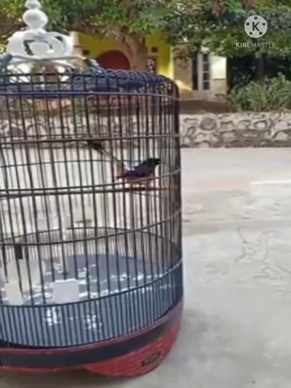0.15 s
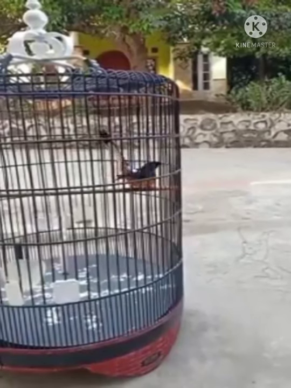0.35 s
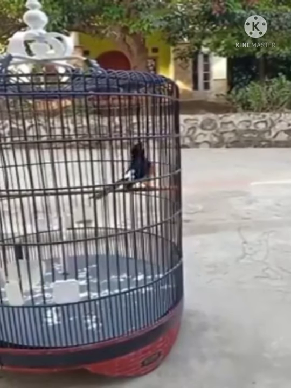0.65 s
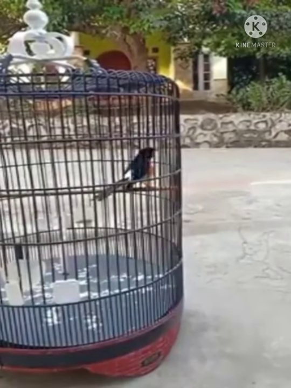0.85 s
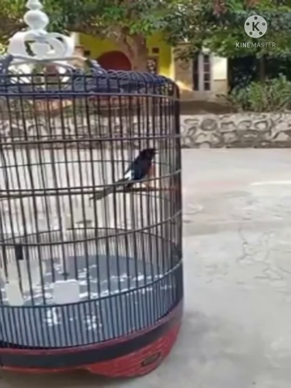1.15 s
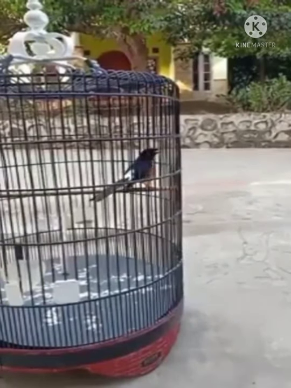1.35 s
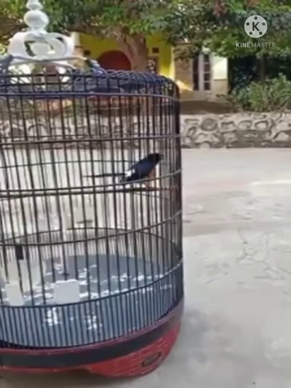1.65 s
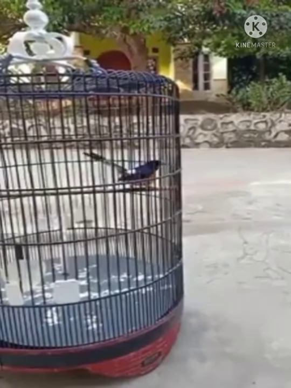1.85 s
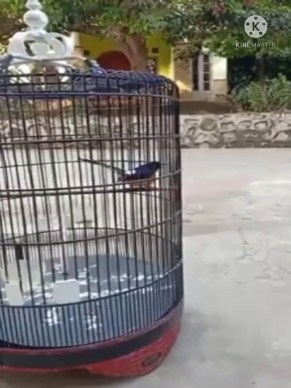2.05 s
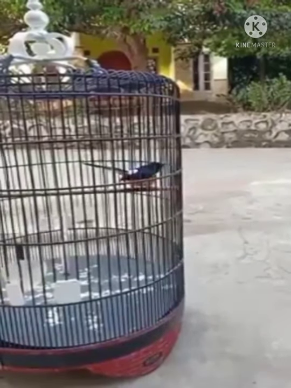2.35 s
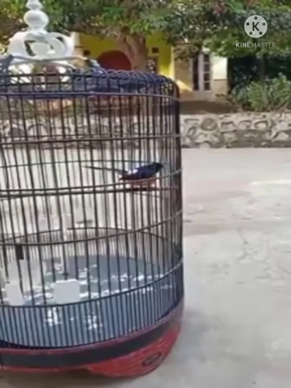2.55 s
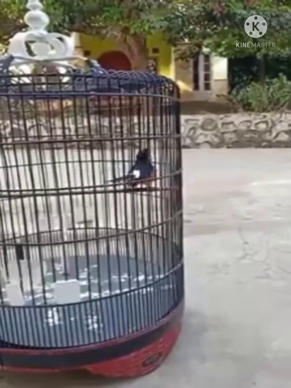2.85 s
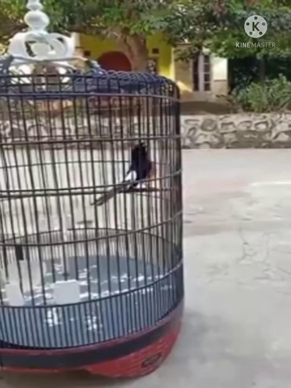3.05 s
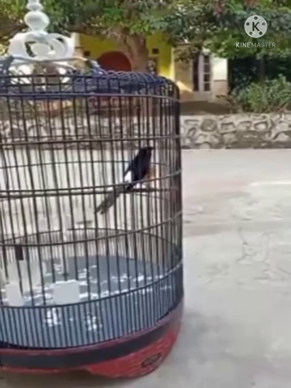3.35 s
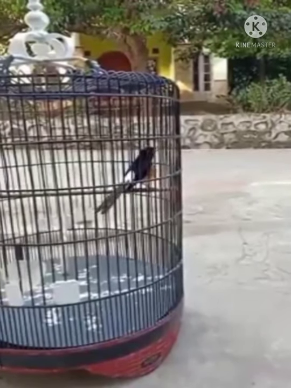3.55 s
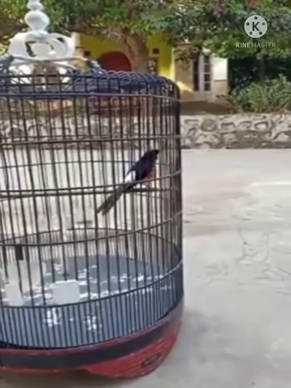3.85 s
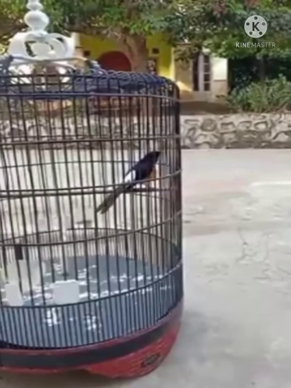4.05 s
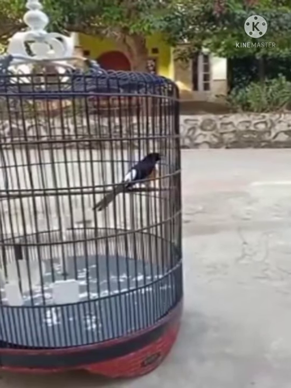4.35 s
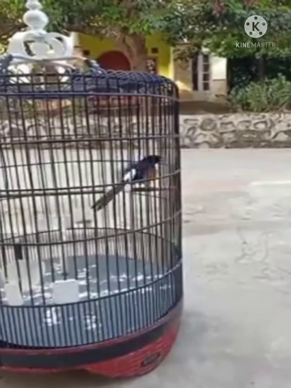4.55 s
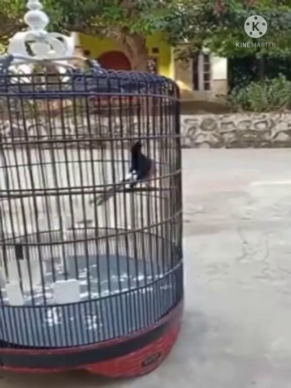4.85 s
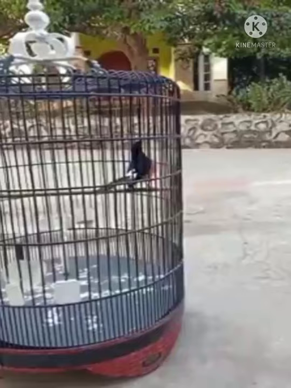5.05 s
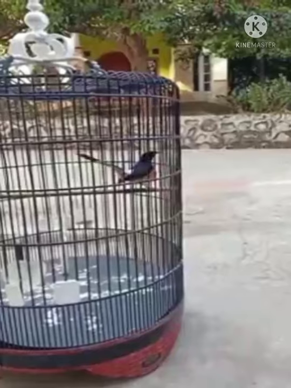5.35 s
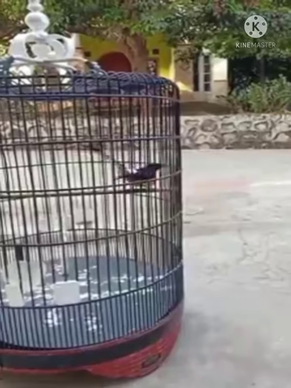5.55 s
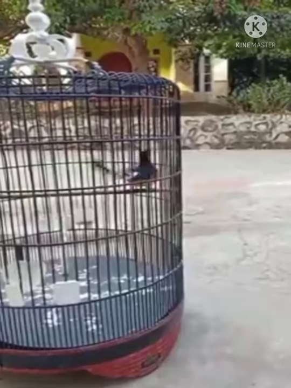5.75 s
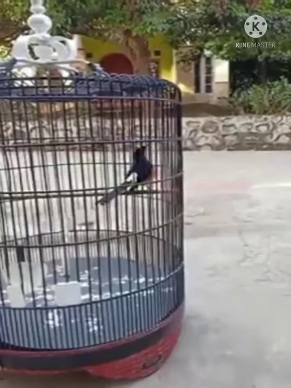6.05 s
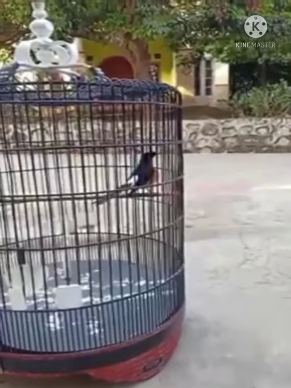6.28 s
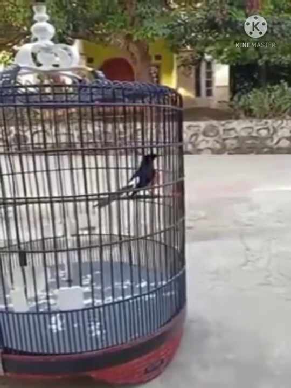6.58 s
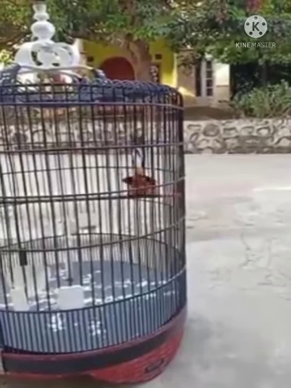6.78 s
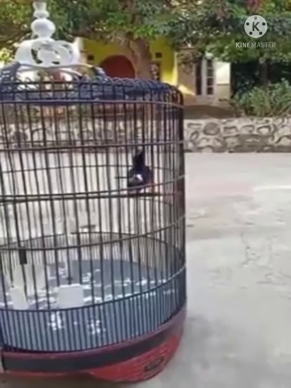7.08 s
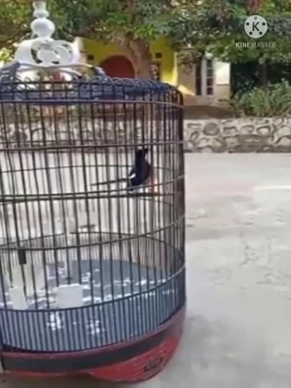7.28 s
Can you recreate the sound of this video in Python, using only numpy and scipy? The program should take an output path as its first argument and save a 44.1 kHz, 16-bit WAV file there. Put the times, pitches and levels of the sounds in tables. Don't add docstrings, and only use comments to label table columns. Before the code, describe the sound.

Close to a phone microphone, a caged bird opens with brief chirps, then a pulsing climbing whistle and a long falling one. Bubbling warbles alternate with squealing, hissing outbursts, then a pause and three harsh rasps. Distant birds trill and whistle; an engine drones and a motorbike passes late. The walled yard adds short echoes, and the loudest notes distort.

```python
import sys
import numpy as np
from scipy import signal
from scipy.fft import next_fast_len
from scipy.io import wavfile
from scipy.ndimage import uniform_filter1d

SR = 44100
rng = np.random.default_rng(int(sys.argv[2]) if len(sys.argv) > 2 else 0)


def field_ratio(decibels):
    return 10 ** (np.asarray(decibels, dtype=float) / 20)


def transcribe(u):
    v = np.clip(np.atleast_2d(u).T, -1, 1)
    q = np.round(v * 32767).astype(np.int16)
    wavfile.write(sys.argv[1], SR, q)


N = 327222


def evened(x):
    return x / np.sqrt(np.mean(x ** 2) + 1e-20)


def add(mix, s, sound):
    sound = sound[max(-round(s * SR), 0):]
    part = mix[max(round(s * SR), 0):][:len(sound)]
    part += sound[:len(part)]


def columns(rows):
    s, *values = np.transpose(rows)
    t = np.arange(s[0], s[-1], 1 / SR)
    return [np.interp(t, s, v) for v in values]


def band(x, lo_hz, hi_hz):
    sos = signal.butter(4, [lo_hz, hi_hz], "band", fs=SR, output="sos")
    return signal.sosfiltfilt(sos, x, padtype="even")


def wobble(count, hz):
    knots = rng.standard_normal(int(8 * hz * N / SR) + 2)
    smooth = evened(uniform_filter1d(uniform_filter1d(knots, size=8), size=8))
    return np.interp(np.arange(count) * (8 * hz / SR), np.arange(len(knots)), smooth)


def ramps(count, fade_s):
    t = np.arange(count) / SR
    return np.clip(np.minimum(t, t[::-1]) / fade_s, 0, 1)


def noise(spectrum, patchy_db):
    hz = np.fft.rfftfreq(1024, 1 / SR)
    a, b, patches = rng.standard_normal((N // 256 + 5, 513, 3)).T
    patches = evened(uniform_filter1d(uniform_filter1d(patches, 8, 0), 14, 1))
    f, db = np.transpose(spectrum)
    colour_db = np.interp(np.log(hz + 1), np.log(f + 1), db)[:, None]
    spectra = (a + 1j * b) * field_ratio(colour_db + patchy_db * patches)
    x = signal.istft(spectra, nperseg=1024, noverlap=768)[1][:N]
    return x / np.std(band(x, 240, 692))


# frequency in Hz, density in dB per Hz.
AIR_SPECTRUM = [(15, -40.5), (25, -10), (48, -14), (72, -3), (172, -2.5), (410, -16.5), (980, -13),
                (1460, -20), (1760, -12), (1890, -16.5), (2690, -11), (2960, -32), (5450, -21),
                (6900, -28.5), (8970, -64), (15200, -120)]
# time in seconds, level in dB.
AIR_LEVEL = [(0.0, -49.5), (4.09, -57), (5.1, -47.5), (7.42, -56)]


def yard_air():
    out, level_db = np.zeros(N), columns(AIR_LEVEL)[0]
    add(out, 0, field_ratio(level_db - 1.5) * noise(AIR_SPECTRUM, 1.8)[:len(level_db)])
    return out


def exhaust(turns, orders, drift_db):
    count = len(turns)
    out = np.zeros(count)
    for k, db in orders:
        level = field_ratio(db + drift_db * wobble(count, 0.84))
        out += level * np.cos(2 * np.pi * (k * turns + .08 * wobble(count, 3)))
    return out


# time in seconds, firings in Hz, levels of multiples 4, 5 and 6 in dB.
DRONE = [(0.0, 30.2, -34, -35.5, -37), (1.07, 33.0, -44, -51.5, -56), (2.56, 33.56, -48, -49.5, -61),
         (3.41, 23.62, -54, -56, -52), (6.1, 28.4, -50, -41, -42), (7.42, 30.78, -50, -43, -46)]
# multiple of the firing rate, level in dB.
DRONE_ORDERS = [(2, -55), (3, -50), (7, -63), (8, -61), (9, -60), (10, -59.5)]


def drone():
    out = np.zeros(N)
    rate, *levels = columns(DRONE)
    orders = DRONE_ORDERS + list(zip(range(4, 7), levels))
    add(out, 0, field_ratio(-0.5) * exhaust(np.cumsum(rate) / SR, orders, 2.3))
    return out


# time in seconds, firings in Hz, exhaust level in dB, tyre and engine rush in dB.
BIKE = [(0, 19, -54.5, -63.5), (1.6, 19, -47, -57), (3, 19, -46, -51.5), (4.1, 18.9, -54, -51),
        (4.6, 18.7, -44, -42), (5.1, 18.4, -52, -35), (5.5, 18.3, -49, -35), (5.8, 17.7, -43, -39.5),
        (6.2, 17.6, -59, -48), (7.42, 16, -55, -51)]
# multiple of the firing rate, level in dB.
BIKE_ORDERS = [(3, -15.5), (4, -0.5), (5, -10), (6, 9.5), (7, -6), (8, 3.5), (9, -1), (10, -12.5)]
# frequency in Hz, density in dB per Hz.
RUSH_SPECTRUM = [(120, -44.5), (200, -16.5), (432, -9.5), (684, -3.5), (867, -15.5), (1040, -12),
                 (1390, -13), (2750, -13), (6900, -22.5), (8970, -49.5), (15200, -120)]


def motorbike():
    out = np.zeros(N)
    rate, db, rush_db = columns(BIKE)
    turns = np.cumsum(rate) / SR
    throb = 1 + 0.1 * np.cos(2 * np.pi * turns)
    add(out, 0, field_ratio(db) * evened(exhaust(turns, BIKE_ORDERS, 5.4)))
    add(out, 0, field_ratio(rush_db - 5) * throb * noise(RUSH_SPECTRUM, 3.5)[:len(turns)])
    return out


def tone(hz, overtone_db):
    turn = 2 * np.pi * np.cumsum(hz) / SR
    second = field_ratio(overtone_db - 14.3 * (hz / 1000 - 1))
    return np.sin(turn) + second * np.sin(2 * turn) + second ** 3.1 * np.sin(3 * turn)


def sing(notes, overtone_db, edge, waver, flutter_db, rough_hz):
    out, bend, shake = np.zeros(N), wobble(N, rough_hz), wobble(N, rough_hz)
    for s, length, start, middle, end, db in notes:
        u = np.linspace(0, 1, max(int(1.15 * length * SR), 8))
        at = min(max(round(s * SR), 0), N - len(u))
        parabola = np.polyfit([0, .5, 1], [start, middle, end], 2)
        hz = np.polyval(parabola, np.clip(1.15 * u - .075, 0, 1))
        hz = hz * (1 + waver * bend[at:][:len(u)])
        level = field_ratio(db + flutter_db * shake[at:][:len(u)])
        level = level * signal.windows.tukey(len(u), np.clip(edge, 0, 1))
        add(out, s - .075 * length, level * tone(hz, overtone_db))
    return out


def whistled(notes):
    return sing(notes, overtone_db=-29.5, edge=0.7, waver=0.0045, flutter_db=1.2, rough_hz=122.1)


def bowed(rows, bow):
    return [(s, length, a, (a + b) / 2 * (1 + bow), b, db) for s, length, a, b, db in rows]


# start in seconds, length in seconds, first pitch in Hz, last pitch in Hz, peak level in dB.
ARCHED = [(-.003, .033, 2580, 2560, -13.5), (.031, .01, 2600, 2600, -22), (.044, .018, 2600, 2550, -19),
          (2.597, .011, 2180, 2280, -16), (4.153, .014, 2100, 2230, -19), (2.938, .008, 2500, 3000, -18),
          (6.862, .009, 5100, 5150, -26), (6.951, .014, 2250, 2400, -30), (6.974, .012, 3400, 3500, -33),
          (7.134, .02, 2330, 2340, -27), (7.357, .009, 900, 1200, -30), (.113, .1, 1280, 1990, -24),
          (.204, .069, 1920, 1910, -22.5), (2.603, .015, 2250, 2520, 1), (2.947, .016, 1950, 2600, -6),
          (3.054, .0092, 2180, 1900, -3), (3.084, .043, 2230, 1800, -3.5), (4.16, .027, 2380, 2370, 2),
          (4.283, .016, 6000, 6050, -22), (2.705, .009, 5100, 5300, -10.5), (6.69, .014, 4200, 3950, -9.5),
          (6.845, .024, 5450, 5650, -24), (6.716, .01, 5400, 5100, -12), (4.869, .042, 3450, 4100, -12),
          (4.867, .045, 4450, 5200, -17)]
SAGGING = [(.247, .055, 1960, 1830, -15.5), (2.618, .015, 2560, 2250, 2), (6.702, .019, 4000, 2500, -18),
           (2.928, .011, 2800, 2450, -11.5), (2.987, .02, 2620, 2400, -1.5), (3.026, .029, 2430, 2180, .6),
           (4.177, .019, 2420, 2360, 2), (4.863, .047, 2230, 2690, -16.5)]


def single_notes():
    return whistled(bowed(ARCHED, .03) + bowed(SAGGING, -.035))


# start in seconds, length in seconds, pitch in Hz, peak level in dB.
FAR_LEVEL = [(.141, .03, 920, -30.5), (1.081, .22, 1175, -34.5), (2.494, .15, 1205, -32),
             (5.31, .07, 1520, -35), (5.23, .08, 2000, -34), (5.38, .03, 1110, -35), (1.71, .04, 940, -35),
             (3.265, .075, 1200, -37), (3.47, .09, 450, -43), (4.2, .1, 300, -43), (1.03, .06, 790, -41),
             (7.176, .087, 1660, -34), (7.334, .03, 1625, -34), (.079, .02, 1550, -35.4),
             (6.904, .076, 767, -38.5), (1.242, .064, 1597, -38.5)]
# start in seconds, length in seconds, first and last pitch in Hz, peak level in dB.
FAR_GLIDES = [(5.3, .14, 2010, 2200, -29), (5.42, .13, 2180, 2440, -24), (5.755, .12, 1900, 1820, -26),
              (5.865, .045, 1820, 2080, -27), (5.92, .09, 1200, 1400, -32), (6.3, .09, 1230, 1530, -34),
              (6.38, .05, 1500, 1930, -33), (6.95, .033, 2300, 3500, -32), (6.983, .016, 3500, 5150, -30),
              (5.551, .08, 2570, 2890, -26.5), (5.893, .11, 2060, 2430, -21.5),
              (6.004, .065, 2440, 2890, -28.5), (6.11, .15, 1120, 1920, -33.5),
              (6.558, .064, 1630, 2020, -31), (6.635, .08, 2080, 2220, -20), (7.134, .022, 2000, 2080, -26),
              (7.155, .03, 1680, 1560, -30), (6.858, .1, 1770, 1530, -31.5)]
FAR_HOOKED = [(6.497, .06, 2266, 1660, -32.5), (7.0, .13, 1880, 1532, -33)]


def far_birds():
    calls = [(s, length, hz, hz, hz, db) for s, length, hz, db in FAR_LEVEL]
    calls += bowed(FAR_GLIDES, 0) + bowed(FAR_HOOKED, -.11)
    return sing(calls, overtone_db=-33, edge=.7, waver=.005, flutter_db=1.0, rough_hz=60)


# start in seconds, pitch in Hz, peak level in dB, dip at the pulse's ends in dB.
CLIMB = [(.606, 1335, -28, 5), (.674, 1245, -22, 3), (.724, 1264, -21, 4), (.766, 1345, -15, 14),
         (.809, 1404, -15, 13), (.849, 1570, -13, 6), (.898, 1800, -4, 20), (.936, 1890, 2, 24),
         (.982, 2005, -1, 11), (1.013, 2050, -6, 6), (1.03, 2170, -3.5, 10), (1.062, 2220, -8, 3),
         (1.088, 2340, -3.5, 7), (1.137, 2540, 0, 0)]


def climb():
    s, hz, db, dip_db = np.transpose(CLIMB)
    out, t, middle = np.zeros(N), np.arange(s[0], s[-1], 1 / SR), (s[1:] + s[:-1]) / 2
    pulse = np.searchsorted(s, t, "right") - 1
    off = abs(2 * (t - s[pulse]) / np.diff(s)[pulse] - 1) ** 2.2
    glide = np.interp(t, [s[0], *middle, s[-1]], [1420, *hz[:-1], hz[-1]])
    glide = uniform_filter1d(glide * (1 - .035 * off), size=200)
    level_db = uniform_filter1d(db[pulse] - dip_db[pulse] * off, size=200) + .7 * wobble(len(t), 120)
    edge = np.clip(np.minimum(t - s[0], s[-1] - t) / .008, 0, 1)
    add(out, s[0], edge * field_ratio(level_db) * tone(glide * (1 + .004 * wobble(len(t), 120)), -29.5))
    return out


# time in seconds, pitch in Hz, level in dB.
HELD = [(1.278, 2100, -26), (1.3, 2089, -13), (1.375, 2033, -9), (1.395, 2005, -4), (1.43, 2000, -6.5),
        (1.455, 1995, -3.5), (1.5, 1975, -2.5), (1.562, 1910, -2), (1.576, 1725, -13)]
# time in seconds, depth in dB.
PINCHES = [(1.352, 2), (1.372, 3), (1.424, 6), (1.469, 24), (1.518, 6), (1.534, 6)]


def held():
    out, (hz, db) = np.zeros(N), columns(HELD)
    t = HELD[0][0] + np.arange(len(hz)) / SR
    pinch_db = sum(depth_db * np.exp(-((t - s) / .0055) ** 2) for s, depth_db in PINCHES)
    level = np.sqrt(2) * field_ratio(db - pinch_db) * ramps(len(hz), .007)
    add(out, t[0], level * tone(hz * (1 + .004 * wobble(len(hz), 50)), -34))
    return out


# time in seconds, pitch in Hz, level in dB.
TRILL = [
    [(1.28, 2780, -52.5), (1.45, 2914, -38), (1.8, 2939, -31.5), (2.25, 2914, -29), (2.4, 2960, -25.5),
     (2.6, 2990, -27), (2.85, 3010, -26), (2.98, 2950, -35.5)],
    [(5.75, 2724, -46), (5.9, 2750, -40), (6.46, 2725, -47)],
]


def trill():
    out = np.zeros(N)
    for rows in TRILL:
        hz, db = columns(rows)
        beat = 2 * np.pi * np.cumsum(19.0 * (1 + .04 * wobble(len(hz), 5.9))) / SR
        chop = 1 + 0.26 * np.cos(beat) + 0.27 * np.cos(2 * beat) + 0.52 * np.cos(3 * beat)
        level = 1.43 * field_ratio(db + 1.5 * wobble(len(hz), 30))
        add(out, rows[0][0], level * chop * tone(hz * (1 + .006 * wobble(len(hz), 150)), -36))
    return out


# start in seconds, length in seconds, low edge in Hz, high edge in Hz, level in dB.
BREATHS = [(1.77, 0.01, 900, 2600, -30), (2.632, 0.1, 1970, 4300, -21), (2.659, 0.076, 4620, 6500, -22.5),
           (2.921, .045, 1185, 3200, -24), (3.336, .012, 900, 2600, -27), (4.184, 0.035, 1956, 4300, -24),
           (4.218, .13, 2030, 4300, -23), (4.21, .12, 4500, 6700, -30), (4.854, 0.085, 2890, 6800, -24),
           (6.465, .038, 2290, 6800, -13), (6.541, 0.04, 2420, 6800, -17), (6.621, 0.04, 2300, 6800, -17),
           (6.711, 0.03, 2010, 5800, -17), (6.982, 0.04, 2430, 5200, -37), (2.604, .04, 3000, 6700, -38),
           (4.158, .04, 4300, 6700, -38), (7.135, 0.05, 1430, 2600, -30)]


def breaths():
    out, sputter = np.zeros(N), field_ratio(1.97 * wobble(N, 250))
    for (s, length, lo, hi, db), air in zip(BREATHS, rng.standard_normal((len(BREATHS), 8000))):
        u = np.arange(len(air)) / SR / length
        burst = np.clip(u / 0.098, 0, 1) * np.exp(-1.2 * u ** 2)
        add(out, s, field_ratio(db) * evened(band(air, lo, hi)) * burst)
    return out * sputter


# starts of buzz, swoop, first chirp and second chirp in seconds.
OPENINGS = [
    (1.776, 1.898, 2.009, 2.1),
    (3.341, 3.468, 3.583, 3.682),
]
OPENING_DB = [(-16, -19, 2, -3), (-19, -25, -5, 0)]
# length in seconds, pitch at start, middle and end in Hz.
BUZZ = (.104, 1090, 1000, 900)
# start in seconds, then the same columns, peak level in dB.
LAST_BUZZ = (7.36, .062, 1180, 1040, 980, -33)


def buzzes():
    notes = [(s[0], *BUZZ, db[0]) for s, db in zip(OPENINGS, OPENING_DB)] + [LAST_BUZZ]
    return sing(notes, overtone_db=-16, edge=.08, waver=.038, flutter_db=2.6, rough_hz=200)


# length in seconds, pitch at start, middle and end in Hz.
SWOOP_LEAP = (.014, 1000, 1300, 1660)
SWOOP = (.042, 1660, 1740, 1800)
CHIRP = (.046, 1390, 1680, 1700)
SNAP = (.036, 1390, 1740, 1880)
GRACE = (.02, 1520, 1720, 2100)
# start in seconds, length in seconds, low note in dB, top note in dB.
LOOPS = [(2.075, .085, -60, -9), (2.163, .081, -60, -10), (2.243, .063, -12, -15), (2.309, .069, -14, -29),
         (2.376, .061, -17, -28), (2.439, .06, -21, -35), (3.66, .085, -60, -12), (3.745, .083, -60, -13),
         (3.828, .071, -15.5, -20), (3.896, .067, -15, -26), (3.962, .065, -19, -38)]
# start and length as shares of the loop, start, middle and end pitch in Hz.
LOW = (0.0, .32, 870, 910, 1120)
LEAP = (.27, .2, 1050, 1480, 1690)
TOP = (.45, .26, 1690, 1820, 1780)
DROP = (.65, .25, 1820, 1330, 930)
# start and length in seconds, start, middle and end pitch in Hz, level in dB.
SLIDES = [(2.156, .042, 930, 1040, 1260, -17), (3.75, .03, 930, 1040, 1220, -14),
          (2.917, .03, 1750, 1270, 1550, -22)]


def warble():
    notes = list(SLIDES)
    for (_, swoop, one, two), (_, swoop_db, one_db, two_db) in zip(OPENINGS, OPENING_DB):
        notes.append((swoop - SWOOP_LEAP[0], *SWOOP_LEAP, swoop_db - 9))
        notes += [(swoop, *SWOOP, swoop_db), (one, *CHIRP, one_db), (two, *SNAP, two_db)]
        notes += [(s - .014, *GRACE, -18) for s in (one, two)]
    for s, length, low_db, top_db in LOOPS:
        levels = (low_db, low_db - 10, top_db, top_db - 4)
        for (at, share, *hz), db in zip((LOW, LEAP, TOP, DROP), levels):
            notes.append((s + at * length, share * length, *hz, db))
    return sing(notes, overtone_db=-24, edge=0.95, waver=0.007, flutter_db=1.3, rough_hz=295.2)


# time in seconds, pitch in Hz, level in dB.
SCREAMS = [
    [(2.632, 2200, -8), (2.638, 2750, 0), (2.642, 3150, -14), (2.646, 3420, -2), (2.655, 3750, -3),
     (2.661, 3000, -15), (2.667, 2200, -15)],
    [(2.666, 2250, -12), (2.676, 2950, -13), (2.684, 3620, -9), (2.691, 4150, -11), (2.708, 2600, -14),
     (2.717, 3500, -21), (2.724, 3970, -2), (2.73, 3900, -18), (2.736, 3950, -3), (2.742, 3850, -14),
     (2.756, 3800, -24)],
    [(4.192, 2300, -5), (4.211, 3740, -5), (4.223, 2350, -10), (4.233, 2700, -18), (4.241, 3480, -3),
     (4.251, 3750, -3), (4.259, 3660, -3), (4.262, 3050, -13), (4.269, 2200, -17)],
    [(4.268, 2250, -18), (4.279, 3650, -7), (4.291, 4150, -10), (4.307, 3550, -8), (4.313, 3300, -19),
     (4.321, 3740, -10), (4.329, 3660, -20), (4.334, 3700, -12), (4.341, 3500, -20)],
]


def screams():
    out = np.zeros(N)
    for rows in SCREAMS:
        parts = []
        for (s, *a), (end, *b) in zip(rows, rows[1:]):
            u = np.linspace(0, np.pi / 2, round((end - s) * SR), endpoint=False)
            straight = u / (np.pi / 2)
            curve = np.sin(u) if b[0] > a[0] else 1 - np.cos(u)
            way = .5 * curve + .5 * straight
            parts.append([a[0] + (b[0] - a[0]) * way, a[1] + (b[1] - a[1]) * straight])
        hz, db = np.hstack(parts)
        level = ramps(len(hz), .003) * field_ratio(db + 3.0 * wobble(len(hz), 600))
        add(out, rows[0][0], level * tone(hz * (1 + .013 * wobble(len(hz), 400)), -3))
    return out


# start in seconds, peak level in dB.
UNDERTONES = [(2.72, -17), (2.733, -16), (2.752, -16), (2.768, -24), (4.326, -20), (4.348, -16),
              (4.366, -24)]
# length in seconds, pitch at start, middle and end in Hz.
UNDERTONE = (.01, 1920, 1980, 1880)


def undertones():
    return whistled([(s, *UNDERTONE, db) for s, db in UNDERTONES])


# start in seconds, pip in dB, low rasp in dB, high rasp in dB.
HARSH = [
    (6.457, -11, -9, -7.5),
    (6.534, -15, -12, -7.5),
    (6.612, -13, -11, -7.5),
]
# length in seconds, start, middle and end pitch in Hz.
PIP = (.014, 2340, 2350, 2310)
CRACK = (.007, 4650, 4350, 3900)
RASP = (.03, 2950, 3220, 3340)
RASP_END = (.02, 3340, 3380, 3280)
# start and length in seconds, start, middle and end pitch in Hz, peak level in dB.
LAST_RASP = (6.725, .017, 4900, 4870, 4960, 0)
RASP_TAIL = (6.736, .05, 4960, 4920, 4860, -13)


def harsh_calls():
    clear, rasps = [RASP_TAIL], [LAST_RASP]
    for s, pip_db, low_db, high_db in HARSH:
        clear += [(s, *PIP, pip_db - 7), (s, PIP[0], *np.multiply(2, PIP[1:]), pip_db)]
        clear += [(s + .009, *CRACK, low_db), (s + .034, *RASP_END, low_db - 7)]
        rasps.append((s + .012, *RASP, low_db))
        rasps.append((s + .012, RASP[0], *np.multiply(1.92, RASP[1:]), high_db))
    rough = sing(rasps, overtone_db=-20, edge=.7, waver=.022, flutter_db=2.8, rough_hz=1600)
    return whistled(clear) + rough


# delay in seconds, level in dB.
ECHOES = [(.009, -22), (.016, -23), (.024, -23), (.034, -23), (.047, -25), (.068, -27), (.105, -32),
          (.16, -33)]
# frequency in Hz, time to fall 60 dB in seconds.
TAIL = [(800, 0.29), (2000, 0.36), (4000, 0.27), (7000, 0.28)]


def yard_echo(x, tail_db):
    hz, t, z = signal.stft(rng.standard_normal(SR // 2), SR, nperseg=256)
    f, t60 = np.transpose(TAIL)
    decay = field_ratio(-60 * t / np.interp(hz, f, t60)[:, None])
    tail = signal.istft(z * decay, SR, nperseg=256)[1]
    tail *= np.clip(np.arange(len(tail)) / SR / .025, 0, 1) ** 2
    taps = field_ratio(tail_db) * tail / np.linalg.norm(tail)
    for s, db in [(0, 0)] + ECHOES:
        taps[round(s * SR)] += field_ratio(db)
    return signal.fftconvolve(x, taps)[:N]


def scene():
    singer = single_notes() + climb() + breaths() + buzzes() + warble()
    singer += screams() + undertones() + harsh_calls()
    long_note = held()
    near = field_ratio(-1.0) * yard_echo(singer + .4 * long_note, -12.5) + .6 * long_note
    far = field_ratio(-4) * yard_echo(far_birds() + trill(), -8)
    return (near + far + drone() + motorbike() + yard_air())[None]


SPLIT_HZ = 6850


def masked(x, below_db, fade_db):
    hz, _, z = signal.stft(x, SR, nperseg=1024, noverlap=768)
    power = uniform_filter1d(uniform_filter1d(abs(z) ** 2, size=5, axis=0), size=5, axis=1)
    power_db = 10 * np.log10(abs(power) + 1e-20)
    slope = fade_db * hz[:, None] / 1000
    masker_db = np.maximum.accumulate(power_db + slope, axis=0) - slope
    chance = uniform_filter1d(rng.standard_normal(z.shape), size=5, axis=0)
    chance = evened(uniform_filter1d(chance, size=20, axis=1))
    excess_db = masker_db - below_db + 7.0 * chance - power_db
    keep = 1 / (1 + field_ratio(np.clip(3 * excess_db, -90, 60)))
    gain = np.where(hz[:, None] > 2500, keep, 1) * (hz[:, None] < SPLIT_HZ)
    return signal.istft(z * gain, SR, nperseg=1024, noverlap=768)[1][:N]


def tiled(x, tile_db):
    z = signal.stft(x, nperseg=512)[2]
    tiles = rng.standard_normal((len(z) // 6 + 1, z.shape[1] // 16 + 1))
    tiles = np.kron(tiles, np.ones((6, 16)))
    return signal.istft(z * field_ratio(tile_db * tiles[:len(z), :z.shape[1]]), nperseg=512)[1][:N]


# shift in Hz, low edge in Hz, high edge in Hz, level in dB.
COPIES = [(6030, 900, 3300, -14), (8200, 1100, 2400, -22), (10500, 1000, 5100, -14)]
COPY_TRIM_DB = [-6, -9, -6]
# start in seconds, length in seconds, pitch in Hz, level in dB.
WHINE = (6.615, .125, 7311, -37)


def rebuilt_treble(low):
    t = np.arange(N) / SR
    upper_power = band(low, 5830, 7700) ** 2 + field_ratio(-80) * low ** 2
    brightness = abs(uniform_filter1d(upper_power, 350)) ** 0.42
    out = field_ratio(-19.5) * brightness * evened(band(rng.standard_normal(N), SPLIT_HZ, 15400))
    for (shift, lo, hi, db), trim_db in zip(COPIES, COPY_TRIM_DB):
        part = signal.hilbert(band(low, lo, hi), next_fast_len(N))[:N]
        part = part / np.sqrt(abs(uniform_filter1d(abs(part) ** 2, 500)) + 1e-9)
        shifted = (part * np.exp(2j * np.pi * shift * t)).real
        out += field_ratio(db + trim_db) * brightness * shifted
    s, length, hz, db = WHINE
    whine = sing([(s, length, hz, hz, hz, db)], -90, .3, 0, 2.0, 40)
    return tiled(out, tile_db=3.2) + whine


# time in seconds, ceiling as a share of full scale.
CEILING = [(1.3, .97), (1.38, .85), (1.42, .62), (1.44, .87), (1.49, .95), (1.53, .95), (1.536, .85),
           (2.14, .87), (2.5, .97), (3.09, .95), (3.115, .66), (3.7, .8), (4, .95)]


def overload(x):
    ceiling = np.interp(np.arange(N) / SR, *np.transpose(CEILING))
    return np.clip(x * field_ratio(0.73), -ceiling, ceiling) + .0023


def band_limit(x):
    return signal.sosfilt(signal.butter(12, 15640, fs=SR, output="sos"), x)


def record(dry):
    heard = band(band(dry[0], 50, 9900), 15, 7400)
    low = masked(heard, below_db=46, fade_db=3.0)
    mix = overload(low + rebuilt_treble(low))
    return band_limit(mix[None])


dry = scene()
out = record(dry)
transcribe(out)
```